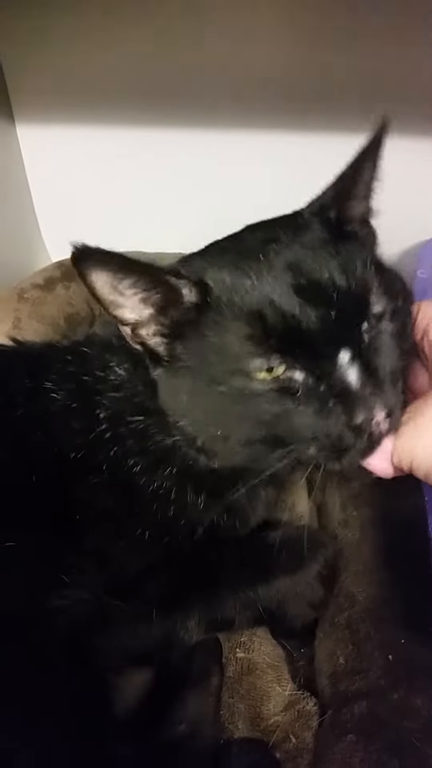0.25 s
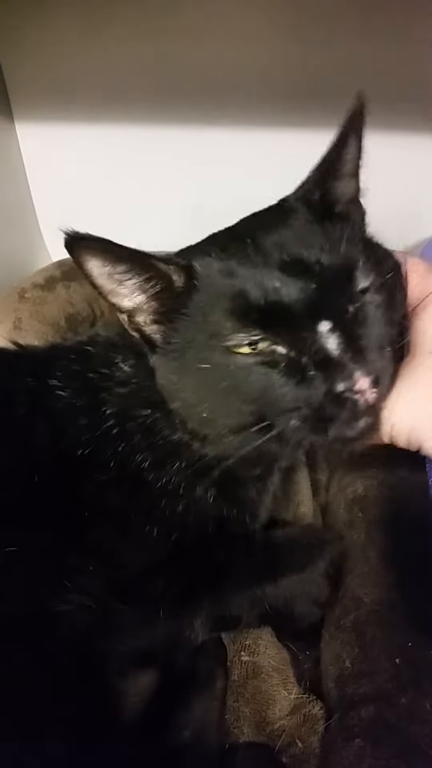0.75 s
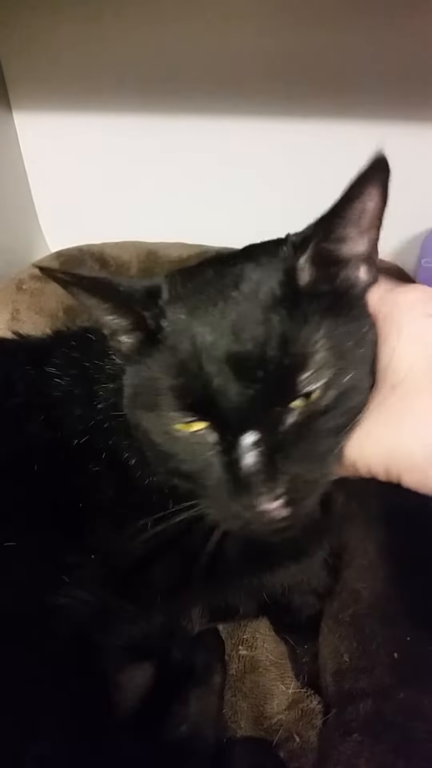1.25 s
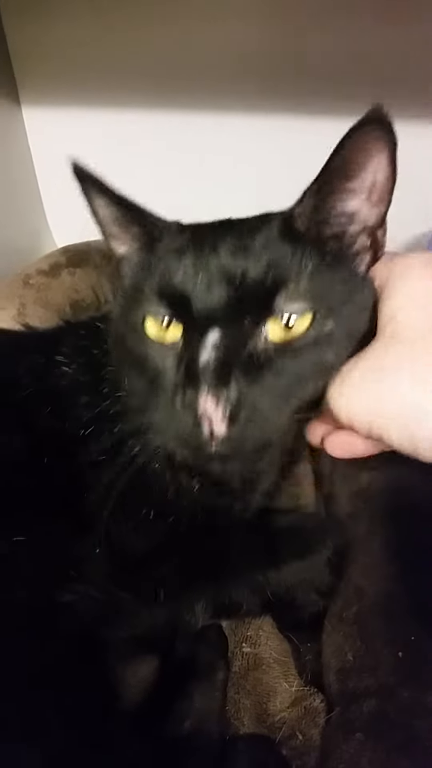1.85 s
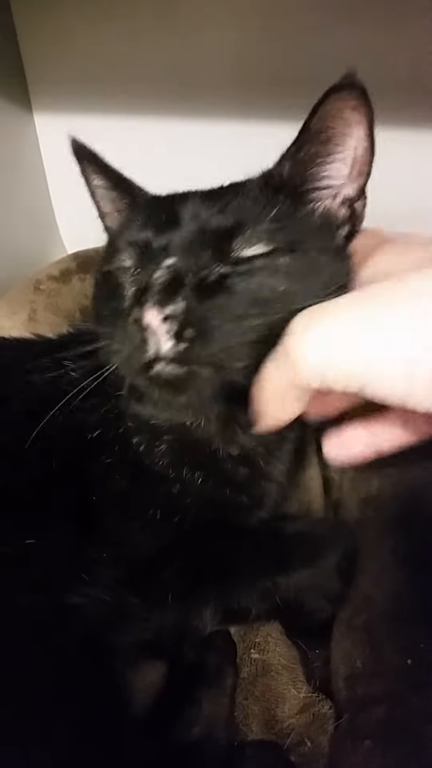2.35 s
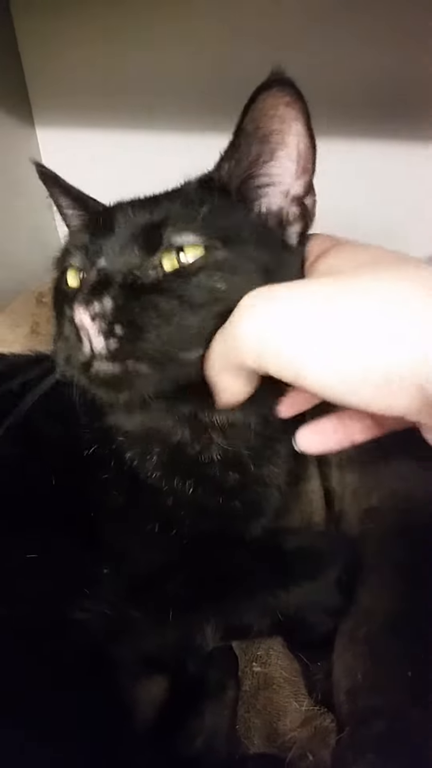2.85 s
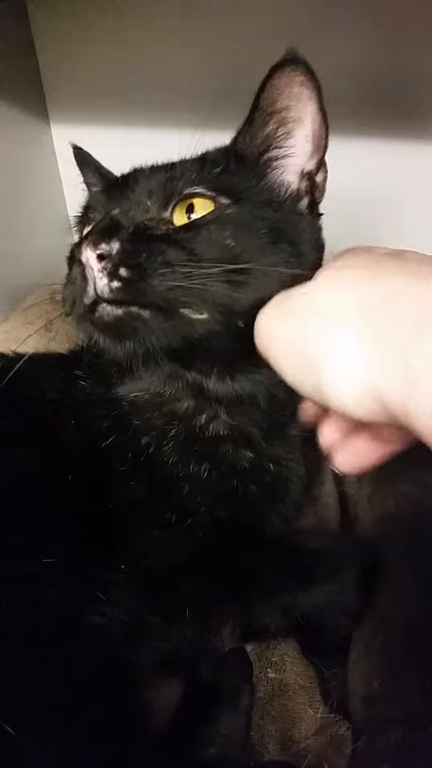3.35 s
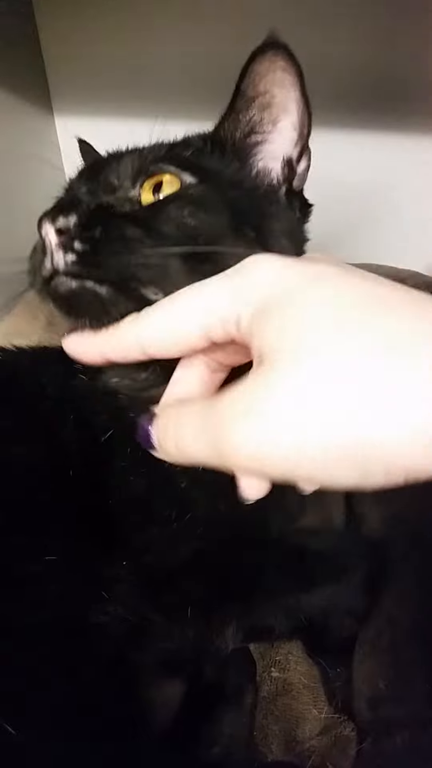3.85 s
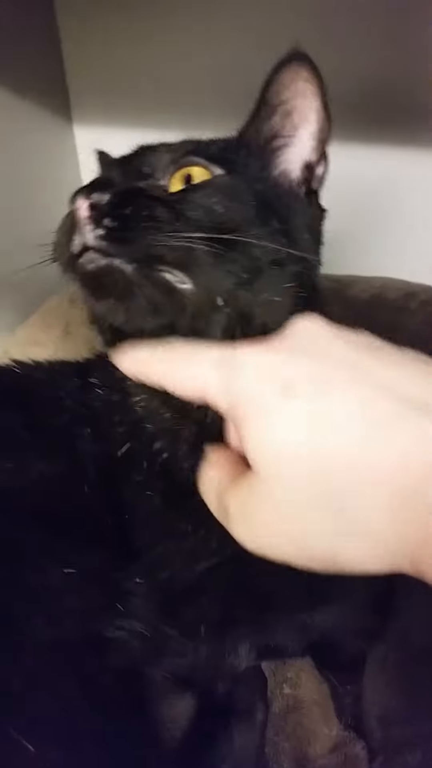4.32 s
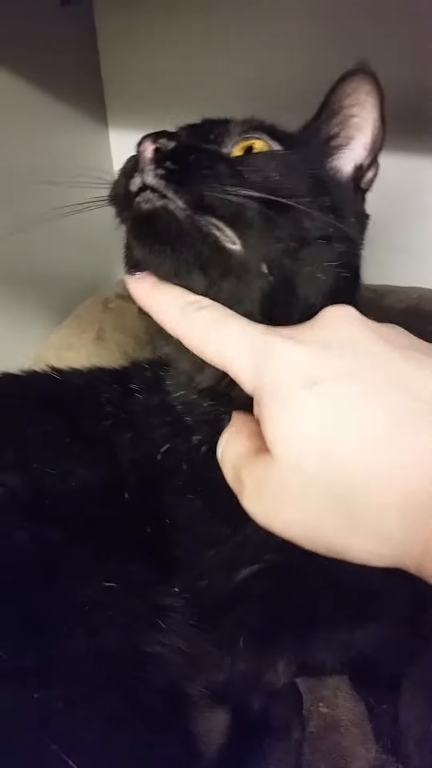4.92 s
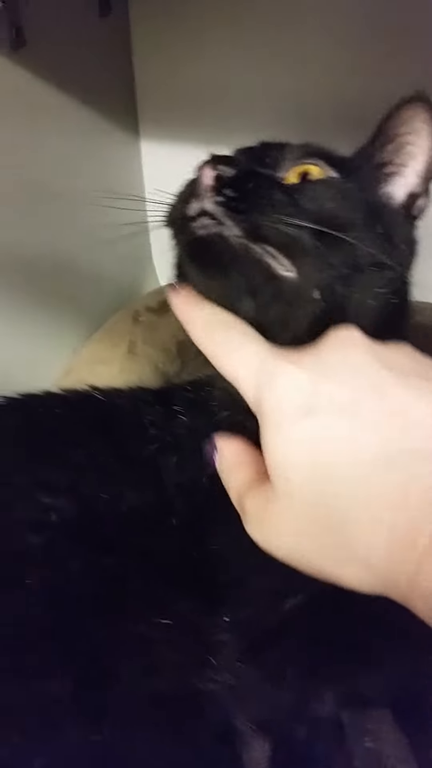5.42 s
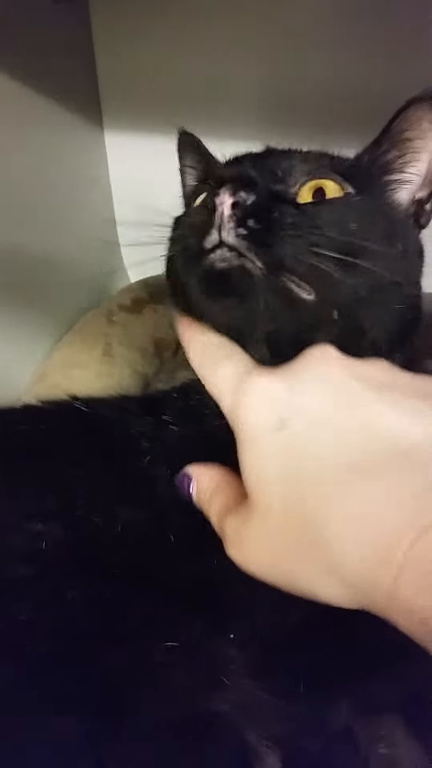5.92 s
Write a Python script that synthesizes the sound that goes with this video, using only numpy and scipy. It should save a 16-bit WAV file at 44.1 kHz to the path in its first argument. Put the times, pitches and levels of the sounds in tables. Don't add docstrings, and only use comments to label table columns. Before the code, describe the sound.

A ventilation fan drones steadily in a small room, low hum over soft rumble and airy hiss, with a few faint wet lick ticks early on.

```python
import sys
import numpy as np
from scipy import signal
from scipy.fft import rfft, irfft, next_fast_len
from scipy.io import wavfile
from scipy.ndimage import uniform_filter1d

SR = 44100
rng = np.random.default_rng(int(sys.argv[2]) if len(sys.argv) > 2 else 0)


def persist_wave(psi):
    counts = np.round(np.clip(psi, -1, 1) * 32767).astype(np.int16)
    wavfile.write(sys.argv[1], SR, np.atleast_2d(counts).T)


def linear_from_db(decibels):
    return 10 ** (np.asarray(decibels, float) / 20)


N = 272538
SIZE = next_fast_len(N + SR)
HZ = np.arange(SIZE // 2 + 1) * SR / SIZE + 1e-3

# start_s, shaft_turns_per_s
SHAFT_SPEED = [
    (0, 17.12),
    (1.15, 17.172),
    (1.9, 17.092),
    (2.8, 17.11),
    (3.45, 17.103),
    (4.05, 17.165),
    (5.45, 17.024),
    (5.85, 17.026),
    (6.18, 17.09),
]
# order, level_db (rms), left_minus_right_db
STEADY_ORDERS = [(2, -44, -1.7), (4, -36.3, -1.3), (7, -43.5, .7), (8, -52, 1.0), (9, -54.5, 1.2),
                 (10, -56.7, -4.9), (11, -59, -2.0), (14, -47, -2.0), (16, -42, -4.4), (20, -44, -3.2),
                 (23, -63, 3), (24, -61, 3), (25, -59, 8), (36, -49, -7.5), (43, -56, -6.0), (54, -57, -3)]
# order, sink_s, lowest_s, back_s, loss_db
MOUNT_LULLS = [
    (5, 2.1, 2.5, 5.3, 5),
    (5, 3.05, 3.25, 5.25, 12),
    (5, 5.4, 6.0, 6.8, 7),
    (6, 0, 0, 1.2, 2),
    (6, 2.1, 2.4, 3.05, 6),
    (6, 2.8, 3.1, 3.5, 2),
    (6, 5.4, 5.6, 6.8, 2.5),
    (6, 5.9, 6.03, 6.15, 6),
]
# middle_s, length_s, gain_db
BLADE_BITES = [
    (2.05, .35, 2),
    (5.3, 0.34, 1.0),
]
# pitch_hz, width_hz, left_pressure, right_pressure (signed, in thousandths)
ROOM_MODES = [(37.2, 12.8, 0.28, 0.36), (72.5, 20.7, 1.98, 2.09), (98.6, 5.6, -6.9, -6.8),
              (116.5, 74.1, -0.51, -0.55), (219.4, 21.6, -1.95, -3.57), (248.5, 33.1, -16.25, -24.13),
              (261.4, 58.9, 26.73, 40.88), (277.4, 59.6, -18.43, -28.06), (311.5, 6.5, 1.9, 3.1),
              (352.8, 29.5, 1.68, 2.71), (388.3, 90.0, -0.4, -0.19), (444.8, 22.8, 0.73, -0.13),
              (489.5, 23.1, 0.27, -0.74), (539.9, 10.7, -0.02, 2.75), (584.0, 78.8, -14.48, -24.97),
              (586.3, 90.0, 13.26, 22.47), (629.6, 14.0, -0.86, -0.95), (683.4, 27.2, -2.05, -3.21),
              (737.5, 4.0, -0.2, 1.7), (752.9, 22.3, -0.62, -0.3), (800.8, 29.2, 2.63, -1.14),
              (803.4, 27.1, -2.12, 0.47), (870.1, 18.1, 0.26, 0.24), (928.4, 19.9, 0.05, 1.07),
              (1002.1, 38.6, 0.24, -0.08), (1098.7, 41.9, -0.02, -0.35), (1122.3, 23.0, -0.29, 0.2),
              (1162.1, 12.4, -0.0, 0.55), (1190.6, 22.6, -0.37, -0.3), (1329.2, 18.8, 0.34, 0.07)]
# pitch_hz, width_hz, steadied_share (0-1)
STEADY_BANDS = [(98, 14, .5), (265, 80, .4), (345, 45, .4), (575, 80, .5), (690, 40, .5)]
# middle_s, length_s, gain_db
LOW_SWELLS = [
    (.4, .8, -1),
    (1.35, 0.36, 7),
    (2.4, .5, -6),
    (3.1, 0.44, 5),
    (3.8, .8, -5.5),
    (4.6, .5, 0),
    (5.3, .4, 8),
]
# pitch_hz, width_hz, left_db, right_db
CUBICLE_RIDGES = [(563, 29, 1.5, 2), (574, 16, -3.5, -1.5), (975, 42, -0.5, 1), (1550, 50, 1, 1.5),
                  (1750, 80, 1, 0), (1854, 54, 1.5, 5.5), (2004, 80, 3, 3), (2380, 68, -4, 3),
                  (2500, 130, 4.5, 2.5), (2680, 60, -2, -2.5), (2750, 64, 1, 5.5), (2900, 70, 1, 2.5),
                  (3150, 70, 2.5, 1), (3310, 100, 4.5, -4), (3900, 120, 3.5, 1), (4080, 60, -5.5, -2.5),
                  (4240, 100, 4, 2), (4540, 64, -0.5, 1.5), (4800, 110, -1.5, 4)]
# pitch_hz, left_db_per_hz, right_db_per_hz
AIR_HISS = [(30, -81, -80), (120, -68, -71.5), (160, -70.5, -72), (220, -75, -65.5), (330, -70.5, -73),
            (430, -77, -82), (500, -72, -70.5), (1230, -73, -72), (1400, -75, -75.5), (2060, -79.5, -78.5),
            (2640, -80, -79), (4170, -89.5, -85), (6570, -98, -96.5), (8100, -92.5, -101),
            (10200, -94.5, -95), (11060, -100.5, -101.5), (11400, -103, -103), (12200, -101, -102),
            (12800, -106.5, -107.5), (13300, -108, -109), (14400, -107.5, -108.5)]
# middle_s, length_s, gain_db
HISS_PUFFS = [
    (.3, .9, 2.5),
    (1.5, .5, -2),
    (1.95, 0.33, 1.5),
    (3.45, .6, 0.5),
    (4.6, 0.74, 2.5),
    (5.7, .4, 1),
]
# start_s, right_port_facing_room (0-1), drawn_out_of_cubicle (0-1)
HAND_TURN = [
    (0, .15, 0),
    (1.0, 0, 0),
    (4.4, 0, 0),
    (5.2, .8, 0),
    (5.45, .9, .1),
    (5.7, 1.0, 1.0),
    (6.18, 1.1, 1.0),
]
# start_s, peak_db, pitch_hz
TONGUE_TICKS = [
    (0.3124, -39, 9400),
    (0.3144, -43, 9200),
    (0.3195, -48, 9400),
    (0.578, -49, 10300),
    (0.597, -50, 11000),
    (0.661, -50, 8000),
    (0.666, -50, 8200),
    (0.671, -52, 7900),
    (0.79, -52, 11500),
]


def in_time(rows):
    s, *columns = np.transpose(rows)
    return [np.interp(np.arange(N) / SR, s, column) for column in columns]


def drift(rate_hz):
    slow = irfft(rfft(rng.standard_normal(SIZE)) / (1 + (HZ / rate_hz) ** 2), SIZE)[:N]
    return slow / slow.std()


def humps_db(rows):
    t = np.arange(N) / SR
    return sum(db * np.exp(-(2 * (t - s) / length) ** 2) for s, length, db in rows)


def coloured(response, channels):
    white = rfft(rng.standard_normal((channels, SIZE)))
    return irfft(white * response * np.sqrt(SR / 2), SIZE)[:, :N]


def high_part(x, edge_hz):
    return signal.sosfiltfilt(signal.butter(3, edge_hz, "high", fs=SR, output="sos"), x)


def band_part(x, hz, width_hz):
    return signal.filtfilt(*signal.iirpeak(hz, hz / width_hz, fs=SR), x)


def lull_db(order):
    t = np.arange(N) / SR
    recover_s = .3
    loss_db = np.zeros(N)
    for lull_order, sink, low, back, db in MOUNT_LULLS:
        if round(lull_order) == order:
            loss_db += np.interp(t, [sink, low, max(low, back - recover_s), back], [0, db, db, 0])
    return loss_db


def fan_tones(turns, orders, flutter_db):
    left_lead_s = 140e-6
    angle = 2 * np.pi * np.cumsum(turns) / SR
    angle = angle + 2 * np.pi * turns.mean() * np.array([[left_lead_s], [0]])
    out = 0
    for order, level_db, pan_db in orders:
        port_db = pan_db / 2 * np.array([[1], [-1]])
        height = np.sqrt(2) * linear_from_db(level_db + flutter_db * drift(rate_hz=1.2) + port_db)
        out = out + height * np.cos(order * angle - order % 2 * np.pi / 2)
    return out


def room_modes(hz):
    left_lead_s = 47e-6
    centre, width, left, right = np.transpose(ROOM_MODES)
    damping = 1j * np.outer(hz, width)
    shape = damping / (centre ** 2 - hz[:, None] ** 2 + damping)
    lead = np.exp(2j * np.pi * hz * np.array([[left_lead_s], [0]]))
    return lead * (shape @ np.transpose([left, right])).T / 1000


def rumble(level_db, gust_db):
    response = np.zeros((2, len(HZ)), complex)
    low = HZ < 2200
    response[:, low] = room_modes(HZ[low]) / np.sqrt(1 + (HZ[low] / 1500) ** 16)
    return linear_from_db(level_db + gust_db * drift(rate_hz=1.5)) * coloured(response, channels=1)


def steadied(x, span_s):
    out = x.copy()
    span = round(span_s * SR)
    for hz, width_hz, share in STEADY_BANDS:
        part = band_part(x, hz, width_hz)
        power = uniform_filter1d(uniform_filter1d((part ** 2).sum(axis=0), span), span)
        out += ((power / power.mean() + .05) ** (-share / 2) - 1) * part
    return out


def air(shared, t60_s):
    hz, *sides_db = np.transpose(AIR_HISS)
    colour = linear_from_db(np.array([np.interp(np.log(HZ), np.log(hz), side_db) for side_db in sides_db]))
    echoes = rng.standard_normal((2, SR // 2)) * linear_from_db(-60 * np.arange(SR // 2) / SR / t60_s)
    echoes[:, 0] = 30
    echoes = rfft(echoes / np.linalg.norm(echoes, axis=1, keepdims=True), SIZE)
    share = shared * HZ ** 2 / (HZ ** 2 + 700 ** 2) / (1 + (HZ / 4500) ** 2)
    diffuse = coloured(colour * np.sqrt(1 - share), channels=2)
    outlet = coloured(colour * echoes * np.sqrt(share), channels=1)
    return diffuse + outlet


def cubicle_ridges(x):
    gain_db = 0
    for hz, width, left_db, right_db in CUBICLE_RIDGES:
        gain_db = gain_db + np.array([[left_db], [right_db]]) / (1 + (2 * (HZ - hz) / width) ** 2)
    return irfft(rfft(x, SIZE) * linear_from_db(gain_db), SIZE)[:, :N]


def licks(decay_s, bright_db, spray_db):
    out = np.zeros((2, N))
    t = np.arange(2000) / SR
    crack_s = .00022
    for s, peak_db, hz in TONGUE_TICKS:
        ring = np.sin(2 * np.pi * hz * t) * t / decay_s * np.exp(1 - t / decay_s)
        crack = np.sin(2 * np.pi * 1.28 * hz * t) * t / crack_s * np.exp(1 - t / crack_s)
        crack = linear_from_db(bright_db) * crack * [[.3], [1]]
        band = signal.butter(2, [hz * .9, 13000], "band", fs=SR, output="sos")
        spray = signal.sosfilt(band, rng.standard_normal((2, 2000)))
        spray = linear_from_db(spray_db) * spray * np.exp(-t / .005)
        out[:, round(s * SR):][:, :2000] += linear_from_db(peak_db) * (ring + crack + spray)
    return out


def scene():
    turns, = in_time(SHAFT_SPEED)
    facing, drawn_out = in_time(HAND_TURN)

    blade_db = -24.5 - 6 * (turns - 17.11) + humps_db(BLADE_BITES)
    fifth_db = -29.6 - lull_db(order=5)
    sixth_db = -26.9 - lull_db(order=6)
    hum = fan_tones(turns, STEADY_ORDERS, flutter_db=0.0)
    hum += fan_tones(turns, [(5, fifth_db, -.7), (6, sixth_db, -.1), (18, blade_db, -3.9)], flutter_db=.3)

    body = steadied(rumble(level_db=0.13, gust_db=.1), span_s=.09)
    body += (linear_from_db(humps_db(BLADE_BITES)) - 1) * band_part(body, hz=310, width_hz=160.0)
    body += (linear_from_db(humps_db(LOW_SWELLS)) - 1) * band_part(body, hz=97.0, width_hz=9.2)
    body += (linear_from_db(-4 * drawn_out) - 1) * high_part(body, edge_hz=520)
    body += (linear_from_db(5 * facing) - 1) * band_part(body, hz=435, width_hz=70)

    hiss = air(shared=.6, t60_s=.25)
    hiss += (linear_from_db(.3 * drift(rate_hz=8.0)) - 1) * high_part(hiss, edge_hz=2600)
    puff_db = humps_db(HISS_PUFFS) + 1.2 * drift(rate_hz=7.0)
    hiss += (linear_from_db(puff_db) - 1) * high_part(hiss, edge_hz=10800)
    hiss += (linear_from_db(.4 * drift(rate_hz=8.0)) - 1) * band_part(hiss, hz=2300, width_hz=1500)
    hiss += (linear_from_db(np.array([[.6], [2.1]]) * facing) - 1) * high_part(hiss, edge_hz=1500)
    hiss += (linear_from_db(1.8 * drawn_out) - 1) * band_part(hiss, hz=2550, width_hz=500)

    return hum + cubicle_ridges(body + hiss) + licks(decay_s=.0004, bright_db=2, spray_db=-5)


def top_cut(x):
    return signal.sosfilt(signal.butter(12, 14450, fs=SR, output="sos"), x)


def record(dry):
    soft = dry + (linear_from_db(-2.0) - 1) * high_part(dry, edge_hz=9200)
    open_s = .0006
    opening = np.minimum(np.arange(N) / SR / open_s, 1)
    mix = soft * np.sin(np.pi / 2 * opening) ** 2
    return top_cut(mix)


dry = scene()
out = record(dry)
persist_wave(out)
```